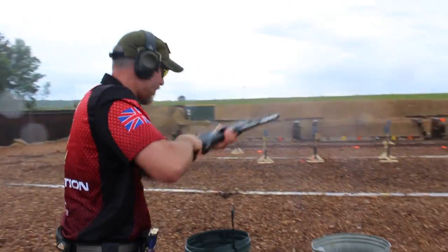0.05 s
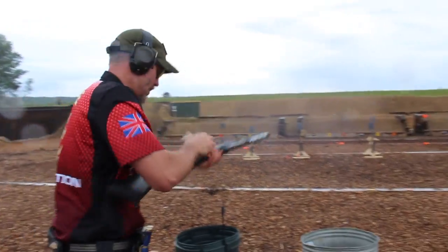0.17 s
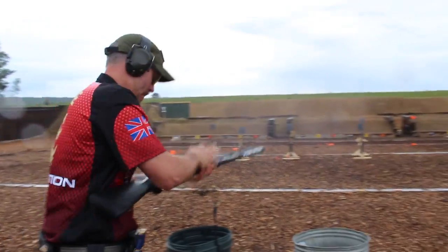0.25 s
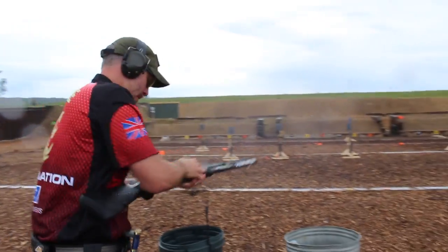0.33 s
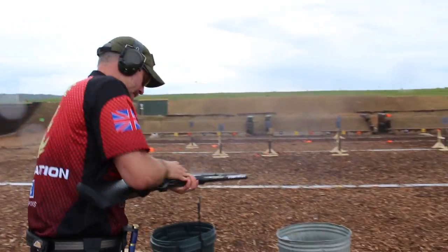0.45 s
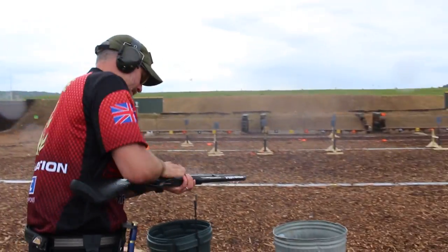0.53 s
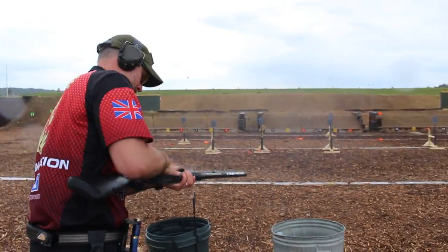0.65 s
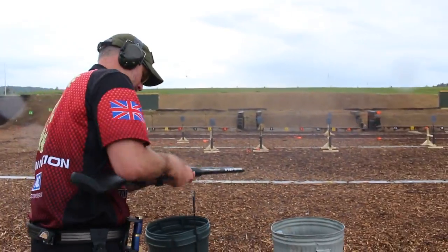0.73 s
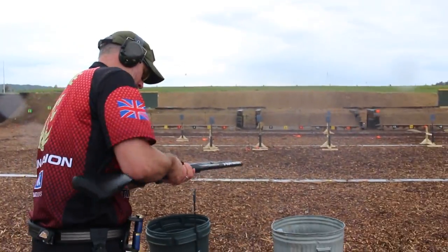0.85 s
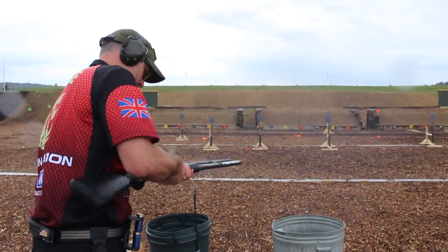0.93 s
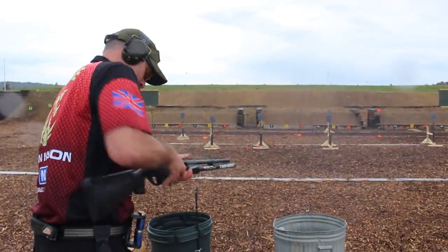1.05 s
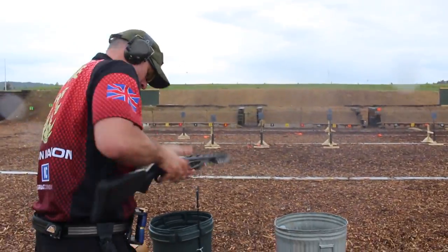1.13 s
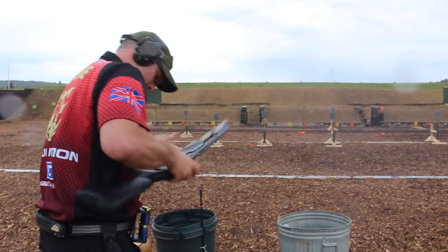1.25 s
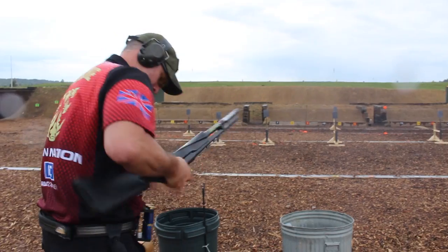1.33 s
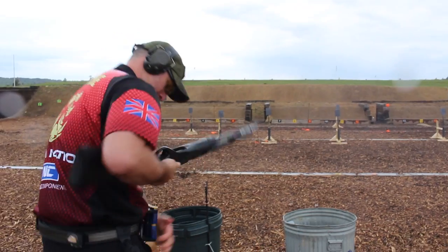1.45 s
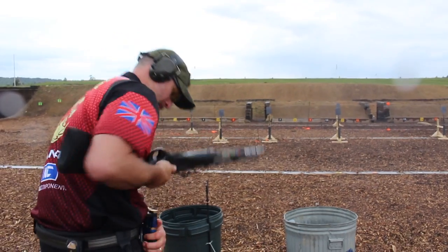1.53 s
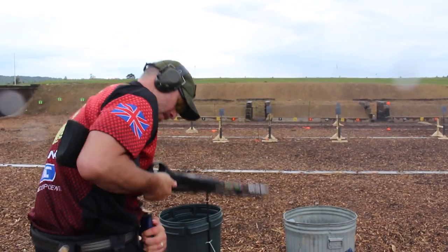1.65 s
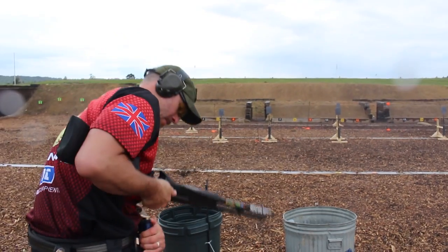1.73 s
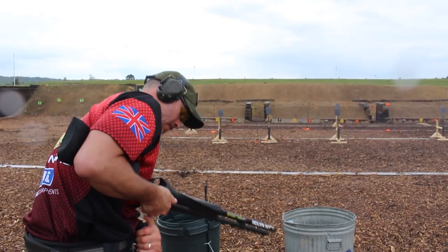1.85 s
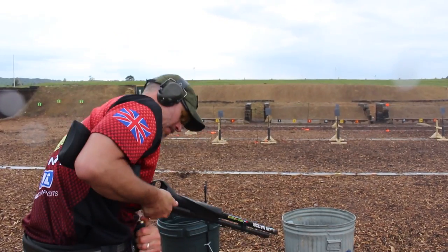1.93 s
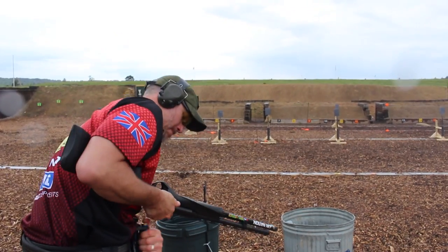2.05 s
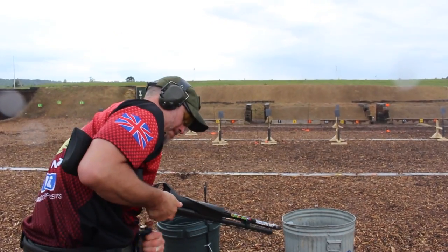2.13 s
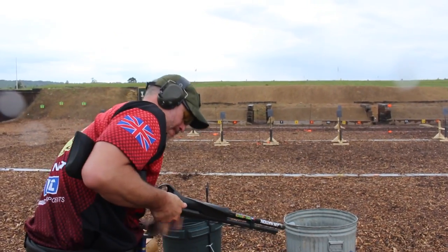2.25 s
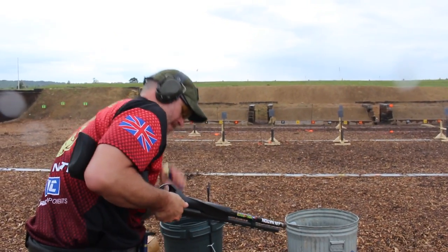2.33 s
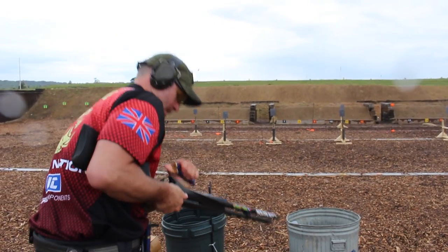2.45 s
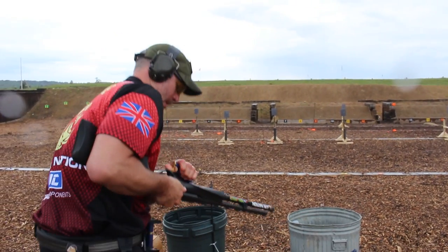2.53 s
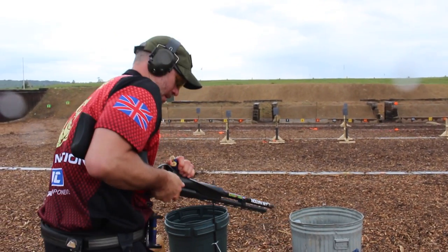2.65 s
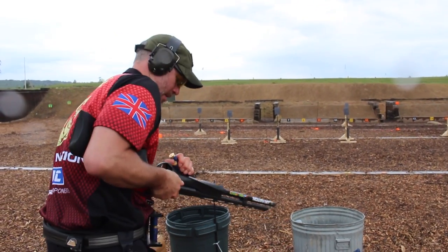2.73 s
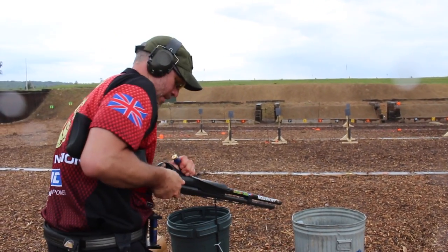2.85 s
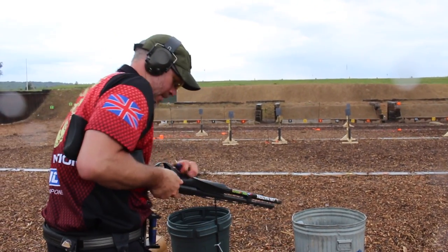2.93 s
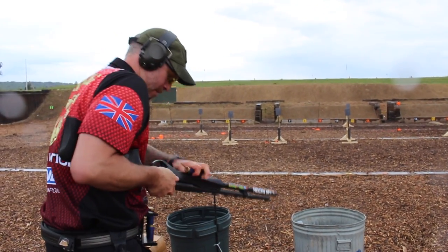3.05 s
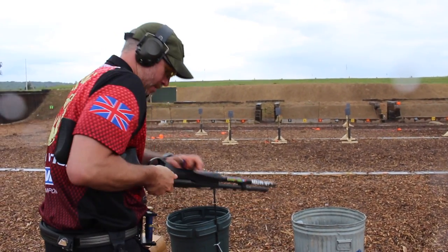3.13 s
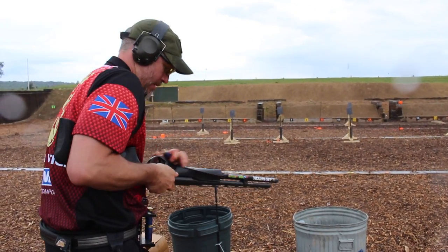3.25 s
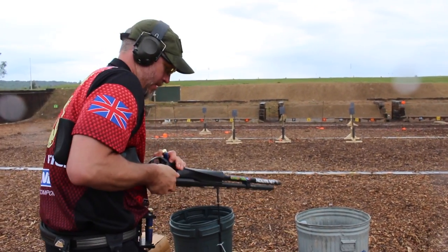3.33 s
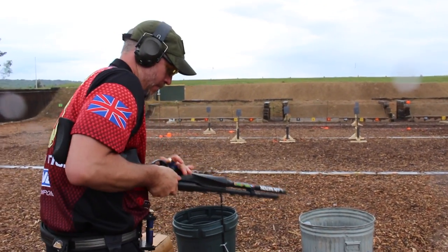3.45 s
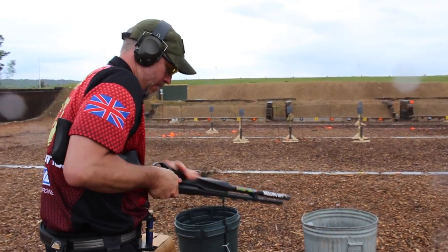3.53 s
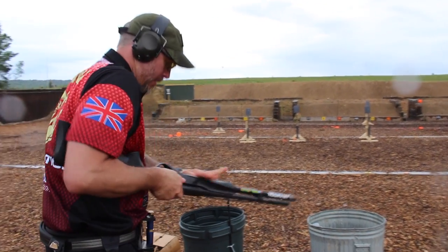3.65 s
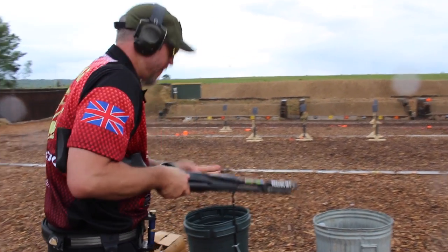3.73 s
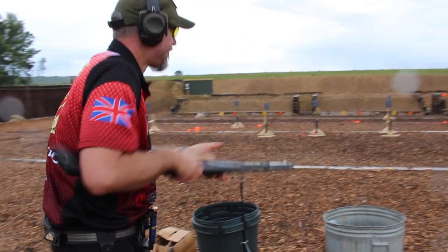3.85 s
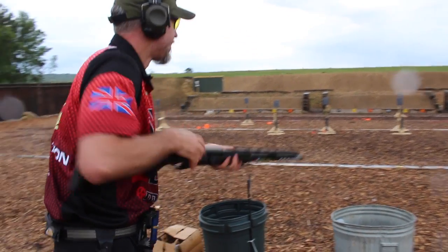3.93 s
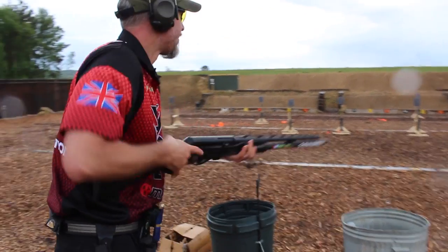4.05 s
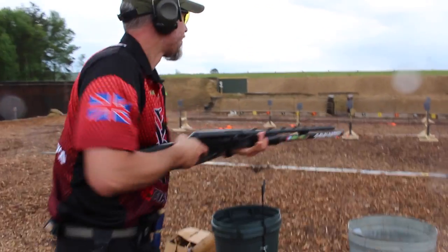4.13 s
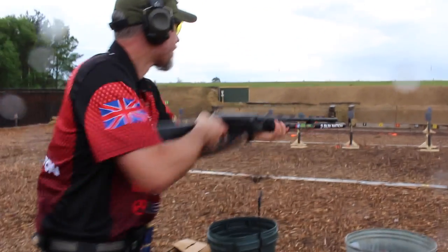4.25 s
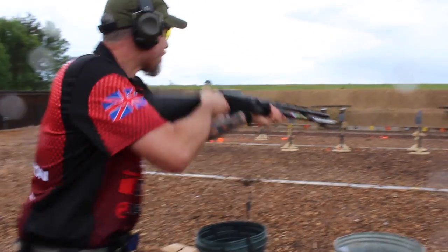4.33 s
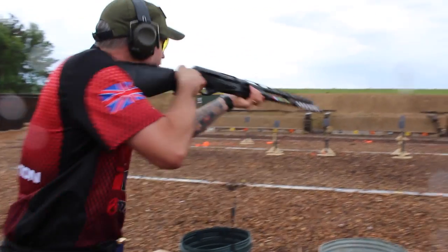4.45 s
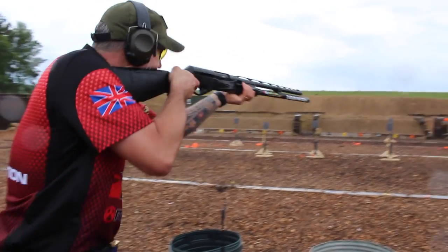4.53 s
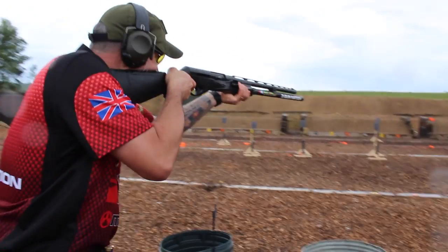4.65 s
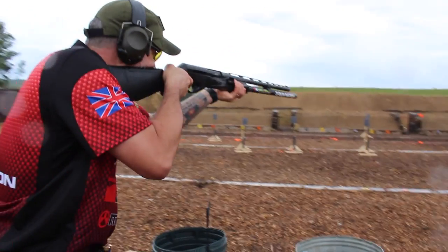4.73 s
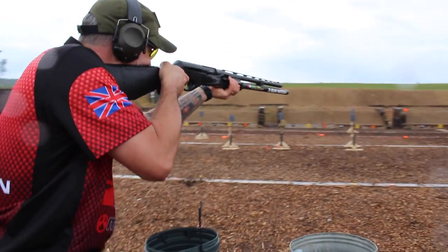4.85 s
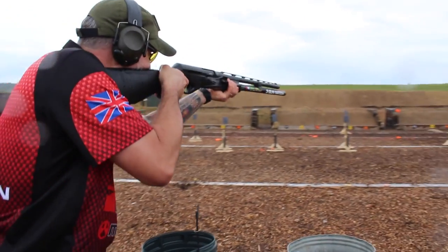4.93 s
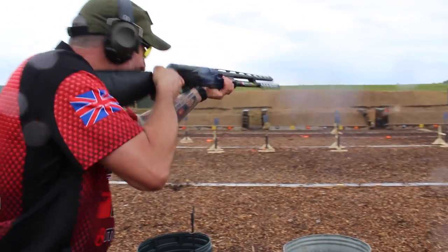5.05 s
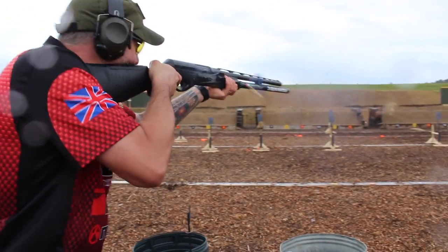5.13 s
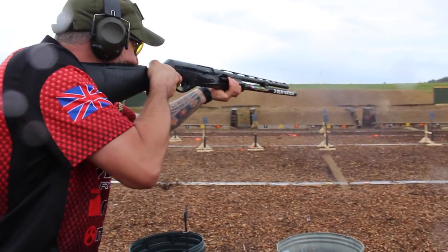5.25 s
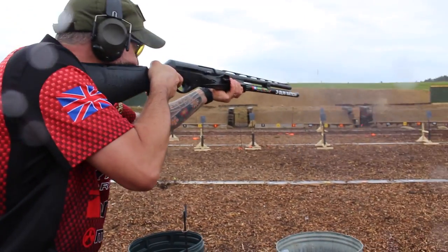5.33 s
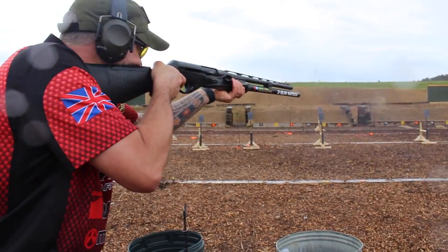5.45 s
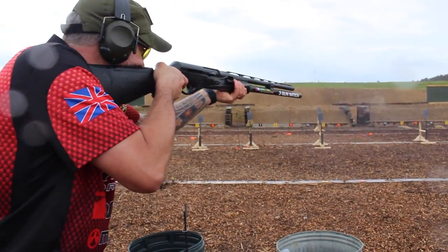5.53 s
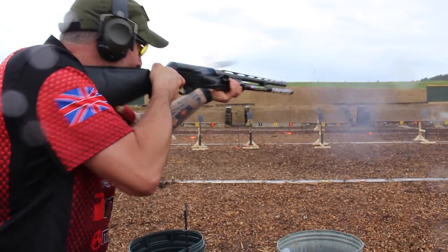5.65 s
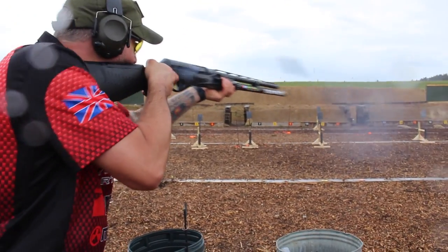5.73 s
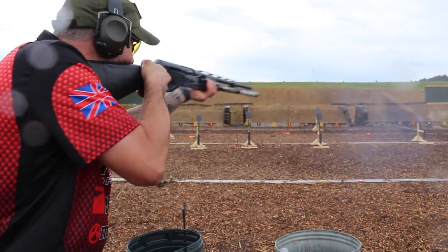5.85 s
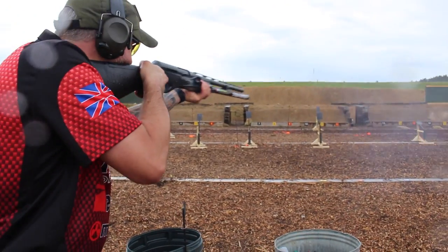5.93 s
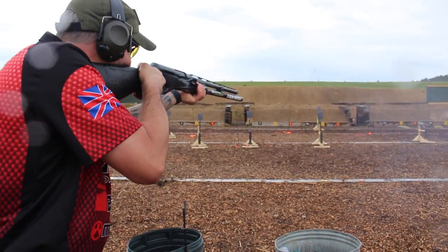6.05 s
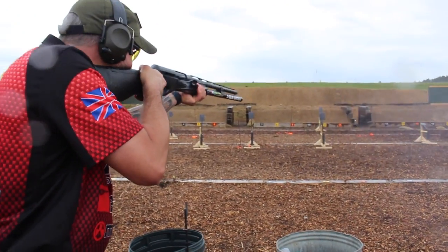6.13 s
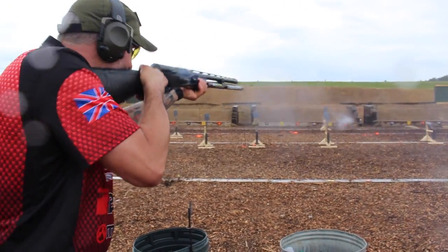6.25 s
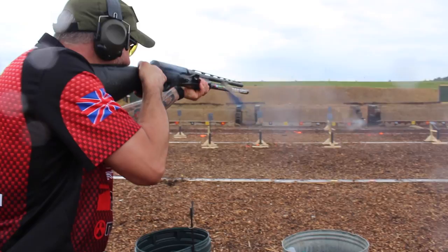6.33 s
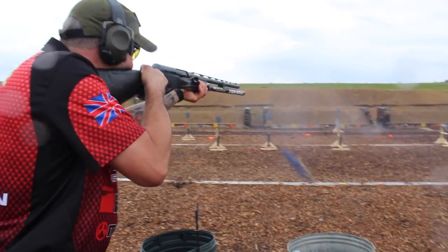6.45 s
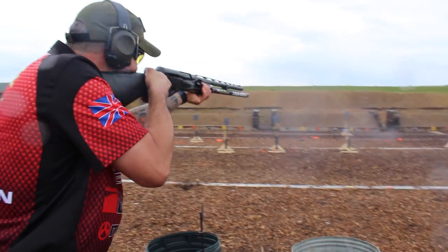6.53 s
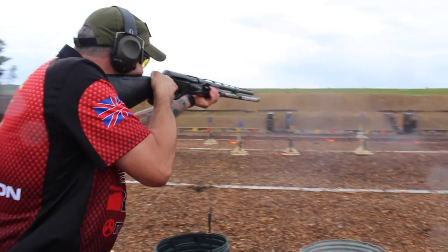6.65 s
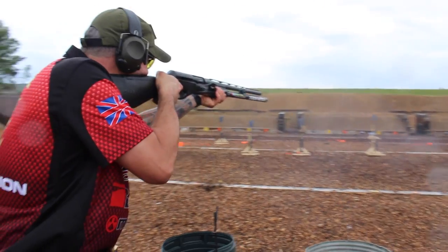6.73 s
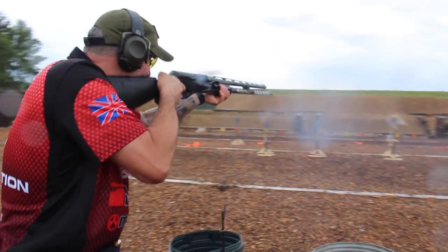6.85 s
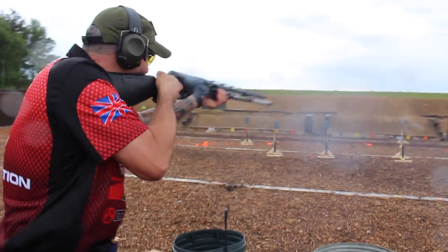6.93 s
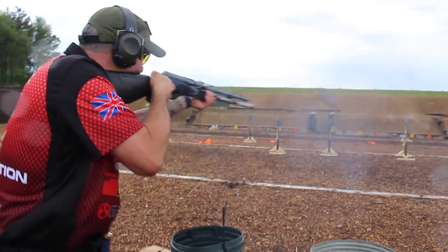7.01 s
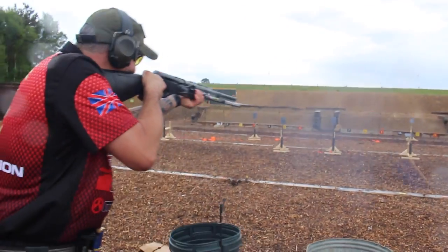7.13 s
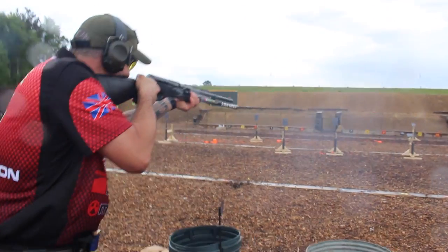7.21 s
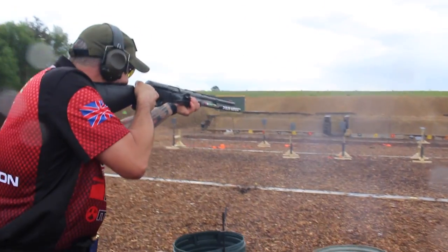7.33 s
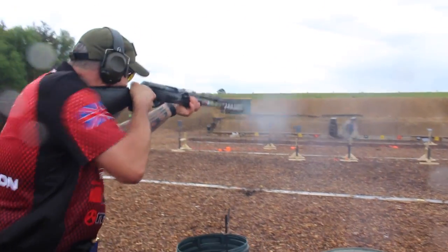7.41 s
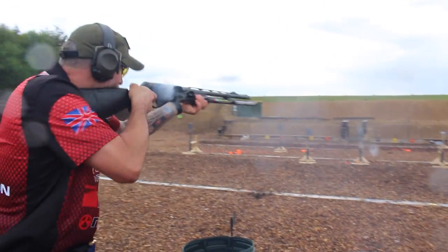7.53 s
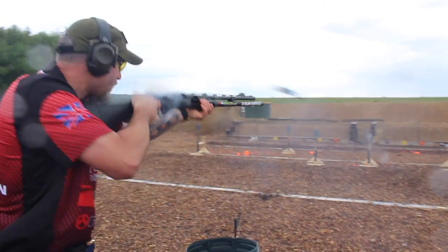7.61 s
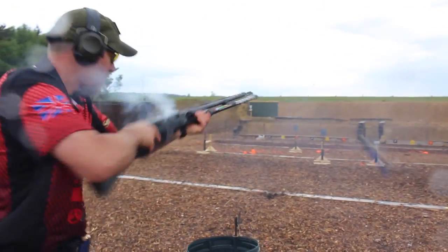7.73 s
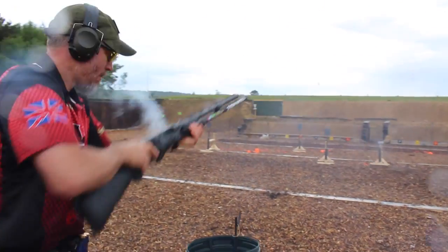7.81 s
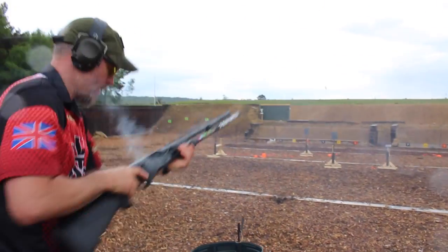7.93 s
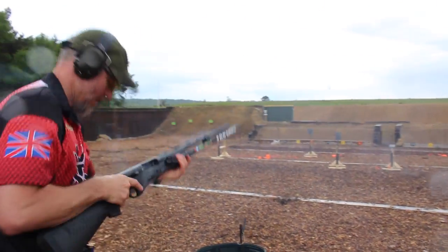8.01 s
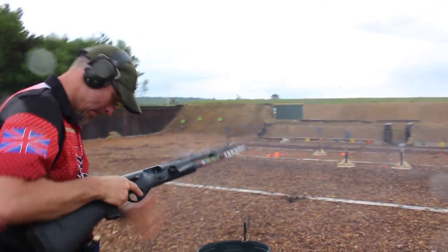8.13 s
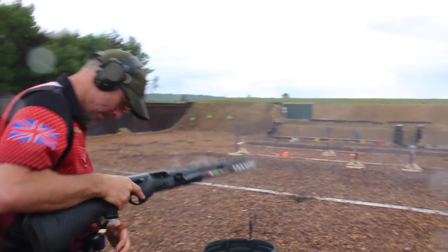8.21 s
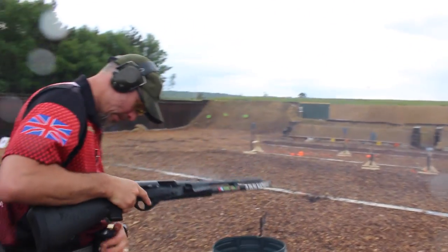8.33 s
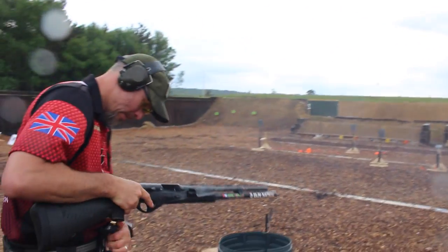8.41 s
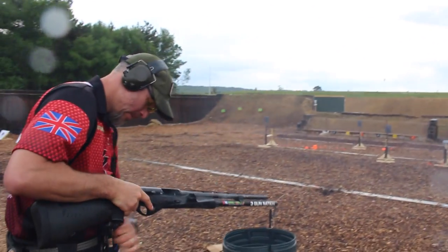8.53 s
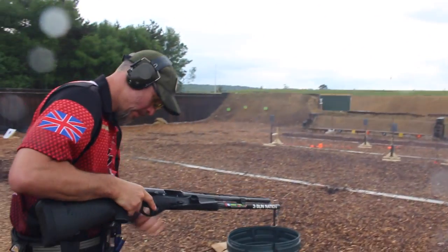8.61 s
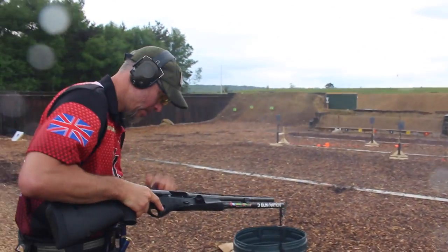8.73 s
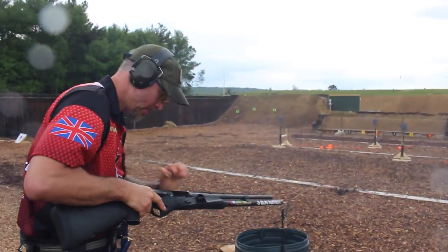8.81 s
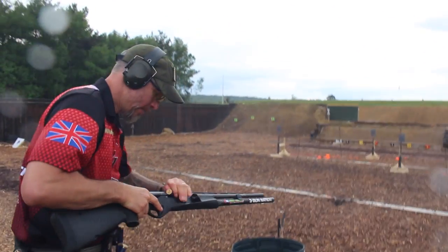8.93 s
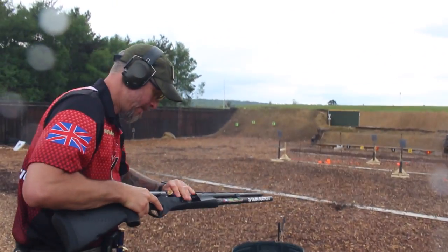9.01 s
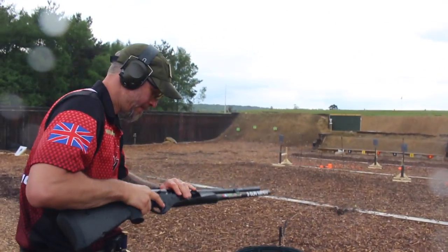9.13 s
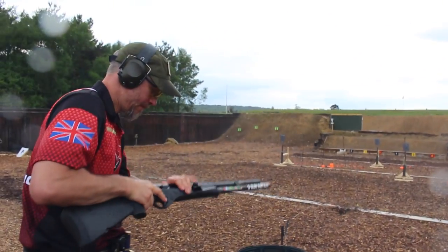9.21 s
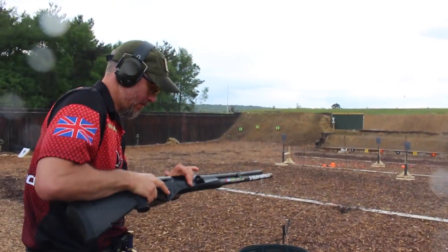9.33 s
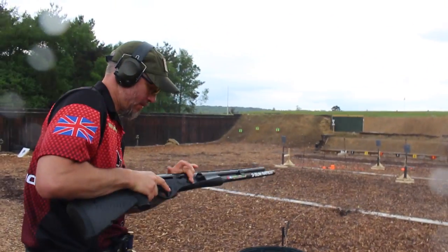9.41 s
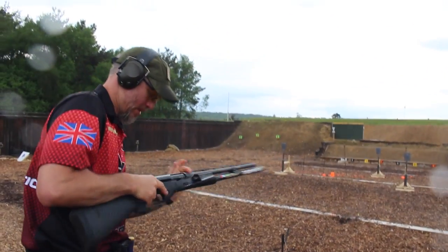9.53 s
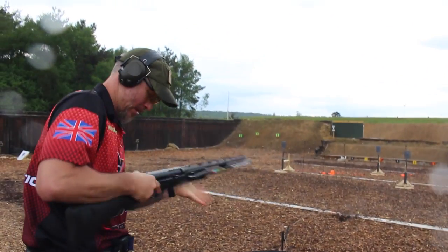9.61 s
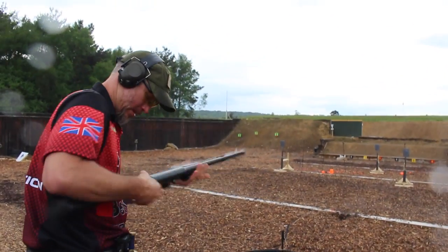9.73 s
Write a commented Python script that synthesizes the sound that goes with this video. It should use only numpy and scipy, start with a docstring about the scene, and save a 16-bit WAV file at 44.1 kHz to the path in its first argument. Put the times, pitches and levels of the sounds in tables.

```python
"""The dying echoes of a shotgun blast come first; then the gun is loaded and fired five times at steel plates.
Each near blast is a pressure pulse with filtered noise bursts, strong enough to overload the microphone.
Steel, bolt and hulls are noise bursts with decaying modes; walls, a ribbed fence and earth banks
return delayed, filtered copies of the energy. Other guns fire in a neighbouring bay,
over a faint outdoor rumble made of filtered noise."""
import sys
import numpy as np
from scipy import signal
from scipy.io import wavfile
from scipy.ndimage import uniform_filter1d

SR = 44100
rng = np.random.default_rng(int(sys.argv[2]) if len(sys.argv) > 2 else 0)


def output_pcm(signal):
    """Save a mono or channel-first signal as 16-bit PCM at the path in sys.argv[1].

    Samples are clipped to [-1, 1] before scaling.
    """
    pcm = np.clip(np.atleast_2d(signal).T, -1, 1) * 32767
    wavfile.write(sys.argv[1], SR, np.round(pcm).astype(np.int16))


N = 430857  # length [samples]

# Levels are relative: each source adds its own gains.
# Near shots: (time [s], blast level [dB], echo level [dB], bass boost of the blast [dB])
SHOTS = [(-.208, 0, -1, -6), (5.0798, -3.5, -.5, 4), (5.6846, -3.5, -1, -0.5), (6.2857, -5.5, -1.5, -13.5),
         (6.8886, -4.5, -0.5, -3.5), (7.5053, -4, -0.5, 2.5)]
# Spectrum of the muzzle blast: (frequency [Hz], level [dB])
BLAST_SPECTRUM = [(30, -14.5), (80, 0), (300, -2.5), (600, -1.5), (1200, -1), (3300, -2), (5000, -13.5),
                  (9000, -16.5), (16000, -18)]
# Modes of the camera body, rung by the blast: (frequency [Hz], level [dB], t60 [s])
HOUSING_MODES = [(124, -8.5, .03), (238, -9.5, 0.027), (347, -11, 0.024), (452, 3, 0.027),
                 (694, -1.5, 0.036), (1242.4, 4, 0.034), (1744, -1.5, 0.026), (2030, -3, .025),
                 (3035, -0.5, 0.023), (3330, 1, 0.023)]
# Echoes off walls and props: (delay [s], level [dB], decay [s], centre [Hz], narrowness Q [1])
ECHOES = [(.026, -18, .0015, 1050, 1.2), (0.027, -14, .002, 382.5, 1.4), (0.065, -22.5, 0.0038, 1170, 0.72),
          (0.084, -21, .0015, 1200, 2.2), (0.0961, -20.5, 0.0066, 258, 0.87),
          (0.1124, -21.5, 0.00079, 1300, 2.2), (.1765, -20.5, .0012, 1130, .8),
          (.177, -25.5, .0039, 165, 1), (.211, -30, 0.024, 2167, 0.75), (.31, -37, 0.034, 2067, 0.693)]
# Spectrum of the hiss thrown back by gravel: (frequency [Hz], level [dB])
GRAVEL_SPECTRUM = [(40, -3), (150, -5), (350, 3), (550, -7.5), (1200, -3.5), (2200, -3), (3300, 1.5),
                   (5000, -6.5), (9000, -6), (16000, -15.5)]
# Spectrum of the roll from the earth banks: (frequency [Hz], level [dB])
BANK_SPECTRUM = [(30, -26), (100, -3), (270, -3.5), (450, -9.5), (750, -4.5), (1250, -1), (1900, -5.5),
                 (2500, -13.5), (3400, -8.5), (5000, -14), (8000, -27.5), (16000, -32)]
# Absorption by the air: (frequency [Hz], loss [dB/s])
AIR_LOSS = [(100, 2), (1000, 5.5), (3500, 4.5), (6000, 22.5), (10000, 37), (16000, 61.5)]
# Gain of sound grazing over the ground: (frequency [Hz], gain [dB])
GROUND_GAIN = [(30, -2.5), (300, 4), (440, -10.5), (650, 6), (2000, 1), (2500, -6), (3300, 3.5), (5000, -1),
               (16000, -10)]
# Pellets strike a plate, or a plate topples:
# (time [s], slap level [dB], slap decay [s], ring level [dB], ring tilt [dB/octave])
PLATE_BLOWS = [(5.1319, -17.5, .004, -60.5, 3), (5.165, -28, 0.0017, -65, 3),
               (5.737, -21.5, 0.0035, -56, -5), (5.8610, -30.5, 0.0046, -52, -16),
               (6.3375, -8.5, 0.002, -44.5, -2), (6.4610, -36, 0.0074, -51, -20),
               (6.9387, -13, .003, -53, 13), (7.5544, -4.5, 0.0026, -40.5, 1)]
# Modes of a steel plate: (frequency [Hz], level [dB], t60 [s])
STEEL_MODES = [(5550, -16.5, 0.53), (5800, -8, 0.49), (5845, -10.5, 0.36), (9170, -5, .27), (9500, -6, .2),
               (9250, -5.5, 0.47), (13790, -16, 0.312)]
# A ping of small metal after some shots: (time [s], tick level [dB], ring level [dB])
PINGS = [(5.7472, -19.5, -48), (6.9741, -17.5, -48.5)]
# Modes of the small metal: (frequency [Hz], level [dB], t60 [s])
PING_MODES = [(5046, -5, .28), (6226, -1, .3), (9636, -8.5, .33), (10550, -14, 0.32), (11130, -6.5, .4),
              (13700, -2, 0.25)]
# Clacks of the action and of shells against it: (time [s], level [dB], decay [s], tilt [dB/octave])
CLACKS = [(.711, -54.5, .014, 4), (2.591, -51.5, .0053, 3), (2.869, -52.5, 0.0013, 1.5),
          (2.907, -57.5, .0022, 4.5), (2.954, -50.5, .018, 7), (3.131, -47.5, .006, 3.5),
          (3.547, -50.5, 0.014, 3.5), (3.745, -49, .003, 3.5), (7.7175, -41.5, 0.0024, 4),
          (7.843, -36.5, 0.013, -5.5), (8.773, -58, .003, 2.5), (8.9938, -55, .002, -1),
          (9.056, -62, .003, 2), (9.138, -58, .0029, 6), (9.193, -60, .001, 7.5), (9.2545, -55, .0019, 2),
          (9.4346, -54, .002, 9)]
# Colour of the gun's receiver: (frequency [Hz], level [dB])
RECEIVER_SPECTRUM = [(100, -53), (380, 0), (600, -5.5), (1000, -0.5), (1400, 0), (2050, 0.5), (2600, -5.5),
                     (3300, -2), (4600, -13.5), (7500, -20.5), (12000, -29.5), (16000, -39)]
# Modes of the receiver: (frequency [Hz], level [dB], t60 [s])
RECEIVER_MODES = [(1140, -0.5, 0.032), (1836, -1, 0.063), (2170, -12, 0.057), (2380, 1, 0.053),
                  (2980, -16.5, 0.049), (3420, 4, 0.039), (3910, -15, .1), (7460, -15, .09),
                  (8600, -15, 0.1)]
# Fingers fumble at the loading port: (start [s], end [s], rate [ticks/s])
FUMBLES = [(2.242, 2.316, 25), (3.361, 3.434, 40), (9.13, 9.24, 28)]
# A shell or the bolt is pushed home: (snap time [s], snap level [dB], catch lead [s], catch level [dB],
# scrape lead [s], scrape level [dB], release level [dB])
STROKES = [(1.0131, -32.5, 0.057, -50, .065, -62, -57.5), (3.109, -40, .046, -42, 0.18, -61.5, -54),
           (3.714, -40.5, .032, -39, .085, -62.5, -58), (9.514, -27.5, 0.056, -47, 0.066, -61, -65)]
# Spent hulls bounce on the ground: (time [s], scuff level [dB], ring level [dB])
HULL_BOUNCES = [(0.441, -51.5, -68), (6.073, -45, -50), (6.636, -49, -58), (7.385, -49.5, -50),
                (7.456, -62, -53)]
# Modes of a hull's metal head: (frequency [Hz], level [dB], t60 [s])
HULL_MODES = [(2510, -2, .14), (3130, 0, .17)]
# Guns in the next bay: (time [s], level [dB], side-wall echo level [dB], low thud gain over the level [dB])
NEIGHBOURS = [(.2235, -23, -20, -14), (5.3365, -20, -18, -9), (9.706, -27, -22, -4)]
# Spectrum of a shot from the next bay: (frequency [Hz], level [dB])
FAR_SPECTRUM = [(40, -26), (110, -3.5), (230, -1.5), (450, -2), (950, 4.5), (1600, -4.5), (2500, -10.5),
                (3600, -8), (6000, -28.5), (10000, -37.5), (16000, -40)]
# Earth banks that scatter a near shot back: (delay [s], level [dB], t60 [s])
NEAR_BANKS = [(.022, -30, .33), (.092, -35, 0.61), (.222, -44.5, .35)]
# Earth banks that scatter a shot from the next bay: (delay [s], level [dB], t60 [s])
FAR_BANKS = [(0, -12, 0.44), (.098, -12.5, 0.15), (.21, -30.5, .25), (.3, -28, 1.3)]
# Spectrum of the distant rumble: (frequency [Hz], level [dB])
RUMBLE_SPECTRUM = [(15, -38), (25, -15), (125, -9), (167, 0.5), (202, -13), (354, -10), (394, -22.5),
                   (475, -10.5), (543, -21.5), (621, -14), (691, -22), (952, -22.5), (1060, -24.5),
                   (1960, -39.5), (15000, -47)]
# Course of the distant rumble before trim and waver: (time [s], level [dB])
RUMBLE_LEVEL = [(0, -66), (2.4, -68), (3.1, -65.5), (4.4, -65.5), (5, -69), (9.77, -65.5)]

# Late answer of the woods beyond: (arrival [s], level [dB], loss per doubling of the delay [dB])
NEAR_WOODS, FAR_WOODS = (.42, -51, 15), (0.64, -43, 7.7)
BASS_HZ = 151  # the bass boost fades above this
# The bolt slams shut this long after every near shot; tilts are in dB per octave
BOLT_S, BOLT_DB, BOLT_DECAY_S, BOLT_TILT_DB = .094, -19.5, 0.0048, 3
CATCH_DECAY_S, CATCH_TILT_DB = 0.0096, 3.5
SNAP_DECAY_S, SNAP_TILT_DB = 0.0055, 2
SLIP_S, SLIP_DB = .007, -21  # the latch slips just before it snaps; dB against the snap
SCRAPE_ON_S = 0.042  # the scrape outlasts the snap
RELEASE_S, RELEASE_DECAY_S = .116, 0.0061  # a light tap as the hand lets go
FUMBLE_DB, FUMBLE_SPREAD_DB = -67, 3
SOUND_SPEED = 343  # m/s
EDGE_HZ = 15850  # upper band limit

HZ = np.fft.rfftfreq(4096, 1 / SR)  # frequency grid of all filters
T = np.arange(int(2.4 * SR)) / SR
SHORT = T[:SR // 5]
BURST_GAIN = np.sqrt(.003 * SR)  # a burst's dB is its energy spread over 3 ms


def shotgun(wander_s=0.00056):
    """Superposition: direct blast, discrete echoes, fence whistle and diffuse roll from the banks."""
    out = np.zeros(N)
    envelope = scatter(NEAR_BANKS, NEAR_WOODS, rise_s=0.01)
    for s, blast_db, echo_db, bass_db in SHOTS:
        add(out, s, amp(blast_db) * muzzle_blast(bass_db))
        add(out, s, amp(echo_db) * roll(BANK_SPECTRUM, envelope, patchy_db=5.5))
        fence = ribbed_fence(distance_m=15, rib_m=.2, fence_db=-35.5, count=165)
        add(out, s, amp(echo_db) * fence)
        for delay, db, decay, hz, q in ECHOES:
            air_db = -delay * read(AIR_LOSS, HZ)
            ground_db = min(delay / 0.25, 1) * read(GROUND_GAIN, HZ)
            front = 0.00099 / decay  # flat walls keep the sharp front, rough banks smear it
            arrival = s + delay + wander_s * rng.standard_normal()
            echo = colour(burst(decay, front), resonance(hz, q) + air_db + ground_db)
            add(out, arrival, amp(db + echo_db) * echo)
    return out


def muzzle_blast(bass_db, blast_db=11, push_db=3.0, push_s=0.0016, ground_db=2, ground_delay=.0048,
                 housing_db=0, gravel_db=-17, gravel_t60=0.19):
    """Blast wave: pressure pulse and crack, ground reflection, forced ringing of the camera, gravel hiss."""
    out = amp(housing_db) * ring(HOUSING_MODES, detune=0.0051, uneven_db=-2.0)
    spectrum = read(BLAST_SPECTRUM, HZ) + bass_db / (1 + (HZ / BASS_HZ) ** 2)
    push = (1 - SHORT / push_s) * np.exp(-SHORT / push_s)  # overpressure, then suction
    add(out, 0, amp(push_db + bass_db) * push)
    add(out, 0, amp(blast_db) * colour(burst(decay=0.0042, front=0.46), spectrum))
    bounce = colour(burst(decay=0.0035, front=0.78), spectrum + band(low_hz=25, high_hz=3280))
    add(out, ground_delay, amp(ground_db) * bounce)
    hiss = rng.standard_normal(len(SHORT)) * np.exp(-np.log(1000) * SHORT / gravel_t60)
    add(out, 0, amp(gravel_db) * colour(hiss, read(GRAVEL_SPECTRUM, HZ)))
    return out


def ribbed_fence(distance_m, rib_m, fence_db, count, uneven_db=-1.0):
    """Periodic reflection: each rib returns a click, and widening gaps make a rough falling whistle."""
    crooked_m = .02 * rng.standard_normal(count)  # ribs out of line blur the overtones
    path_m = np.hypot(distance_m, rib_m * np.arange(count)) + crooked_m
    at = np.minimum(np.round(2 * path_m / SOUND_SPEED * SR).astype(int), SR - 1)
    strength = np.sin(np.linspace(0, np.pi, count)) * amp(uneven_db * rng.standard_normal(count))
    clicks = np.zeros(SR)
    np.add.at(clicks, at, strength)
    gain = amp(fence_db) * np.sqrt(2 * rib_m / SOUND_SPEED * SR)
    return gain * colour(clicks, band(low_hz=700, high_hz=1500) + band(low_hz=300, high_hz=3200))


def roll(spectrum, envelope, patchy_db):
    """Diffuse scattering: crackling noise arrives in coloured clumps, and air absorption takes its treble."""
    x = colour(grains(len(T), grain_db=3.5), read(spectrum, HZ)) * envelope
    hz, t, z = signal.stft(x, SR, nperseg=256)
    patches = uniform_filter1d(rng.standard_normal(z.shape), size=5, axis=0)
    patches = uniform_filter1d(patches, size=5, axis=1)
    depth_db = patchy_db / (1 + 2 * t)  # late arrivals are many and even out
    air_db = -t * read(AIR_LOSS, hz)[:, None]
    z = z * amp(depth_db * patches / patches.std() + air_db)
    return signal.istft(z, SR, nperseg=256)[1][:len(T)]


def scatter(banks, woods, rise_s):
    """Energy addition: the powers of swelling, dying banks and of slowly fading woods give one envelope."""
    power = 0
    for delay, db, t60 in banks:
        rise = np.clip((T - delay) / rise_s, 0, 1)
        decay_db = -60 * np.maximum(T - delay - rise_s, 0) / t60
        power = power + (rise * amp(db + decay_db)) ** 2
    arrival, db, loss_db = woods
    doublings = np.log2(np.maximum(T / arrival, 1))
    late = np.minimum(T / arrival, 1) ** 2 * amp(db - loss_db * doublings)
    return np.sqrt(power + late ** 2)


def plates():
    """Impact excitation: a cloud of pellets slaps the steel, whose modes ring on thinly."""
    out = np.zeros(N)
    for s, db, decay, ring_db, tilt in PLATE_BLOWS:
        add(out, s, amp(db) * colour(burst(decay, front=0.2), band(low_hz=788, high_hz=2670)))
        modes = [(hz, mode_db + tilt * np.log2(hz / 7500), t60) for hz, mode_db, t60 in STEEL_MODES]
        add(out, s, amp(ring_db) * ring(modes, detune=0.0046, uneven_db=1.5))
    return out


def pings():
    """Modal decay of small metal: a hard, bright tick and a thin ring."""
    out = np.zeros(N)
    for s, db, ring_db in PINGS:
        add(out, s, amp(db) * colour(burst(decay=0.0015, front=.09), receiver(tilt_db=9.0)))
        add(out, s, amp(ring_db) * ring(PING_MODES, detune=.002, uneven_db=2.5))
    return out


def action():
    """Metal impacts: the bolt shuts after each shot; clacks and random fumbling ticks come between."""
    out = np.zeros(N)
    for s, *_ in SHOTS:
        add(out, s + BOLT_S, clack(BOLT_DB, BOLT_DECAY_S, BOLT_TILT_DB))
    for s, db, decay, tilt in CLACKS:
        add(out, s, clack(db, decay, tilt))
    for start, end, rate in FUMBLES:
        for s in rng.uniform(start, end, round((end - start) * rate)):
            tick_db = FUMBLE_DB + FUMBLE_SPREAD_DB * rng.standard_normal()
            add(out, s, clack(tick_db, decay=.003, tilt_db=1.5))
    return out


def loading(slide_grain_db=5.5, stick_db=3, slips_per_s=150):
    """Uneven friction, then impact: each stroke scrapes, meets the catch, snaps home and is let go."""
    out = np.zeros(N)
    for s, snap_db, catch_s, catch_db, scrape_s, scrape_db, release_db in STROKES:
        size = int((scrape_s + SCRAPE_ON_S) * SR)
        grip_db = stick_db * np.interp(T[:size] * slips_per_s, np.arange(100), rng.standard_normal(100))
        scrape = grains(size, slide_grain_db) * amp(grip_db) * signal.windows.tukey(size, .25)
        scrape = colour(scrape, receiver(tilt_db=3) + place_colour(depth_db=4.0))
        add(out, s - scrape_s, amp(scrape_db) * scrape)
        add(out, s - catch_s, clack(catch_db, CATCH_DECAY_S, CATCH_TILT_DB))
        add(out, s - SLIP_S, clack(snap_db + SLIP_DB, SNAP_DECAY_S, SNAP_TILT_DB))
        add(out, s, clack(snap_db, SNAP_DECAY_S, SNAP_TILT_DB))
        add(out, s + RELEASE_S, clack(release_db, RELEASE_DECAY_S, tilt_db=-.5))
    return out


def clack(db, decay, tilt_db, after_db=-12, ring_db=-14):
    """Impact on a resonant body: a sharp burst, a brief rattle and the ringing receiver."""
    out = amp(ring_db) * ring(RECEIVER_MODES, detune=0.022, uneven_db=1.0)
    blow = burst(decay, front=0.033) + amp(after_db) * burst(decay=0.015, front=0)
    add(out, 0, colour(blow, receiver(tilt_db) + place_colour(depth_db=3)))
    return amp(db) * out


def receiver(tilt_db):
    """Body resonance: the colour of the gun's receiver in dB, tilted per octave."""
    return read(RECEIVER_SPECTRUM, HZ) + tilt_db * np.log2((HZ + 100) / 2000)


def place_colour(depth_db, count=36):
    """Position-dependent coupling: each place on the gun favours other resonances, a random ripple in dB."""
    ripple_db = depth_db * rng.standard_normal(count)
    return read(np.column_stack([np.geomspace(500, 14000, count), ripple_db]), HZ)


def hulls():
    """Impact and modal decay: empty hulls scuff the gravel and their metal heads tinkle."""
    out = np.zeros(N)
    for s, db, ring_db in HULL_BOUNCES:
        add(out, s, amp(db) * colour(burst(decay=.009, front=.2), band(low_hz=654, high_hz=3000)))
        add(out, s, amp(ring_db) * ring(HULL_MODES, detune=0.0036, uneven_db=-0.5))
    return out


def neighbours(report_db=2, wall_delay=.0776, boom_db=-5, roll_db=-1, rumble_db=-11, fence_lead_s=.019):
    """Screening and reflection: a dull report from behind a bank, fence chirp, wall echo with boom, roll."""
    out = np.zeros(N)
    ground = read(GROUND_GAIN, HZ)
    envelope = scatter(FAR_BANKS, FAR_WOODS, rise_s=0.01)
    report_colour = read(FAR_SPECTRUM, HZ) + band(low_hz=200, high_hz=3000)
    wall_colour = band(low_hz=556, high_hz=1164) + band(low_hz=60, high_hz=6000) + ground
    slap = burst(decay=.002, front=4)  # a flat wall keeps the front dominant
    for s, db, wall_db, thud_db in NEIGHBOURS:
        add(out, s, amp(db + report_db) * colour(burst(decay=0.0064, front=0.47), report_colour))
        thud = colour(burst(decay=.02, front=0.26), resonance(hz=171, q=0.95))
        add(out, s, amp(db + thud_db) * thud)
        add(out, s, amp(db + roll_db) * roll(FAR_SPECTRUM, envelope, patchy_db=-0.5))
        chirp = ribbed_fence(distance_m=4.5, rib_m=.235, fence_db=-8.5, count=38)
        add(out, s - fence_lead_s, amp(db) * chirp)
        add(out, s + wall_delay, amp(wall_db) * colour(slap, wall_colour))
        boom = amp(boom_db) * slap + amp(rumble_db) * burst(decay=0.032, front=0)
        add(out, s + wall_delay, amp(wall_db) * colour(boom, resonance(hz=178.7, q=1.3) + ground))
    return out


def haze(trim_db=-2.0, waver_db=-1.27, hiss_db=-85):
    """Stationary noise: a distant outdoor rumble wavers a little over steady microphone hiss."""
    t = np.arange(N) / SR
    knots = np.linspace(0, t[-1], 80)
    waver = waver_db * np.interp(t, knots, rng.standard_normal(len(knots)))
    level_db = np.interp(t, *np.transpose(RUMBLE_LEVEL)) + waver + trim_db
    rumble = colour(rng.standard_normal(N), read(RUMBLE_SPECTRUM, HZ) + band(low_hz=40, high_hz=4500))
    return amp(level_db) * rumble + amp(hiss_db) * rng.standard_normal(N)


def burst(decay, front):
    """Transient excitation: a sharp front, weighed by front, and an exponentially dying scatter."""
    x = rng.standard_normal(len(SHORT)) * np.exp(-SHORT / max(abs(decay), 1e-4))
    x /= np.linalg.norm(x)
    x[0] += front
    return BURST_GAIN * x / np.linalg.norm(x)


def ring(modes, detune, uneven_db):
    """Modal superposition: dying sines whose pitch and strength differ a little from blow to blow."""
    t = T[:SR]
    chance = rng.standard_normal((len(modes), 2))
    out = np.zeros(len(t))
    for (hz, db, t60), (strength, pitch) in zip(modes, chance):
        level = amp(db + uneven_db * strength - 60 * t / t60)
        out += level * np.sin(2 * np.pi * hz * (1 + detune * pitch) * t)
    return out


def grains(size, grain_db):
    """Impulsive noise: a dense train of clicks of very uneven strength, rms 1."""
    x = rng.standard_normal(size) * amp(grain_db * np.minimum(rng.exponential(1, size), 7))
    return x / x.std()


def colour(x, db):
    """Minimum-phase filtering: a causal filter of unit energy shaped by the gain db on the grid HZ."""
    log_gain = np.log(amp(np.maximum(db - db.max(), -100)))
    circle = np.concatenate([log_gain, log_gain[-2:0:-1]])
    # the Hilbert transform of the log gain gives the phase
    taps = np.fft.ifft(np.exp(np.conj(signal.hilbert(circle)))).real[:len(HZ)]
    return signal.oaconvolve(x, taps / np.linalg.norm(taps))[:len(x)]


def band(low_hz, high_hz):
    """Band-pass response: gain in dB with second-order edges."""
    return -10 * np.log10((1 + (low_hz / (HZ + 1)) ** 4) * (1 + (HZ / high_hz) ** 4))


def resonance(hz, q):
    """Resonant response: gain in dB of a band round hz that narrows with q."""
    ratio = (HZ + 1) / hz
    return -10 * np.log10(1 + (q * (ratio - 1 / ratio)) ** 4)


def amp(db):
    """Logarithmic level: decibels to gain."""
    return 10 ** (np.asarray(db) / 20)


def read(points, hz):
    """Interpolation of a spectrum table on a log-frequency axis."""
    f, value = np.transpose(points)
    return np.interp(np.log(hz + 1), np.log(f + 1), value)


def add(mix, s, sound):
    """Linear superposition: mixes a sound in at time s; what falls outside the mix is cut."""
    start = round(s * SR)
    sound = sound[max(-start, 0):]
    part = mix[max(start, 0):][:len(sound)]
    part += sound[:len(part)]


def scene():
    """Linear superposition of all sources at one microphone."""
    near = shotgun() + plates() + pings() + hulls() + action() + loading()
    return (near + neighbours() + haze())[None]


def record(dry):
    """Overload and band limitation: the input clips hard, then a low-pass removes the top."""
    clipped = np.clip(dry, -.97, .97)
    low_pass = signal.firwin(255, EDGE_HZ, window=("kaiser", 8), fs=SR)
    return signal.oaconvolve(clipped, low_pass[None], "same")


dry = scene()
out = record(dry)
output_pcm(out)
```